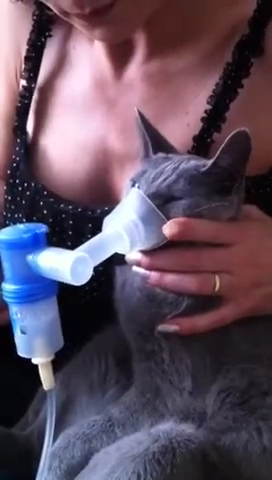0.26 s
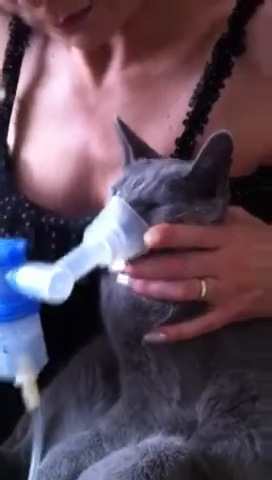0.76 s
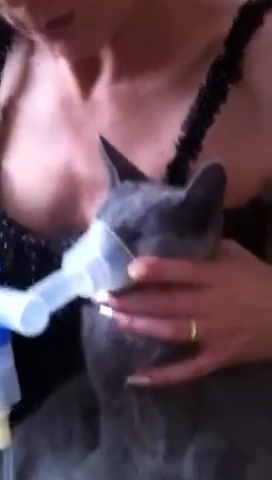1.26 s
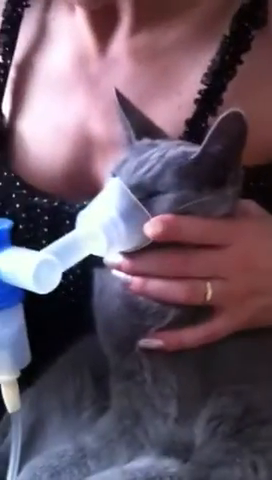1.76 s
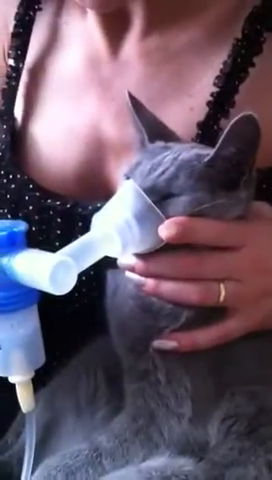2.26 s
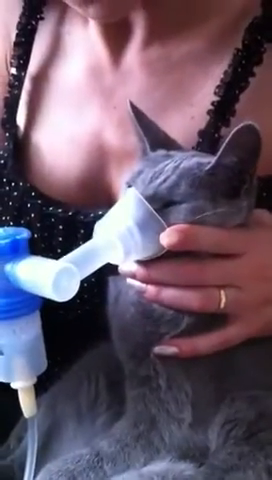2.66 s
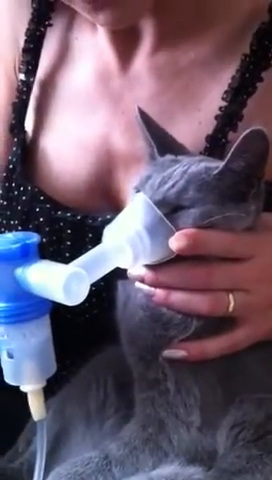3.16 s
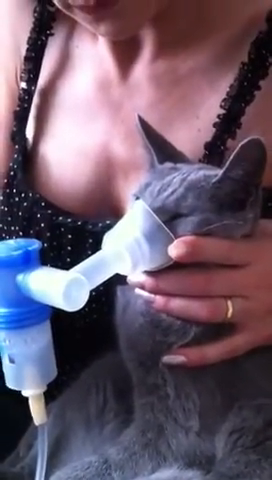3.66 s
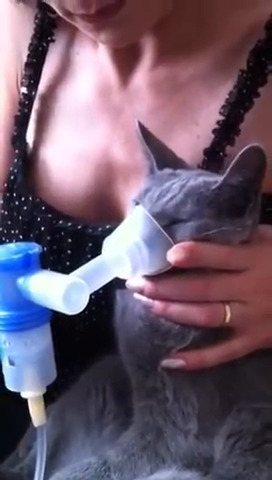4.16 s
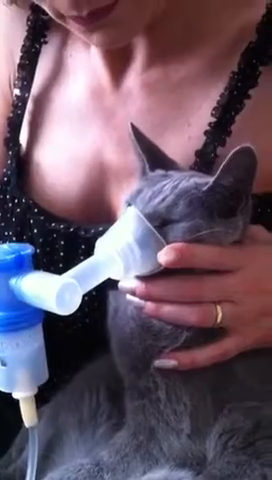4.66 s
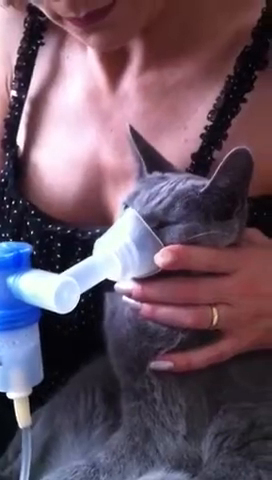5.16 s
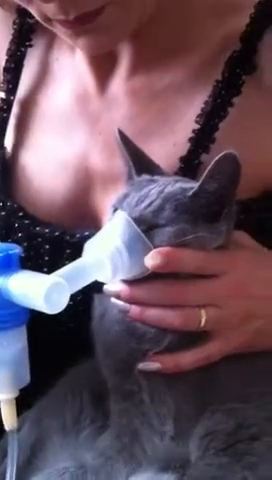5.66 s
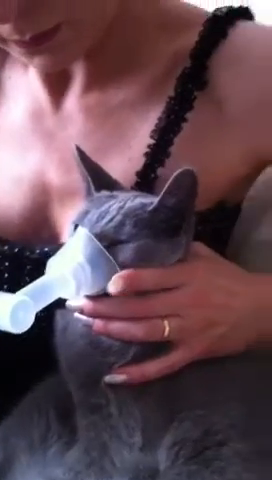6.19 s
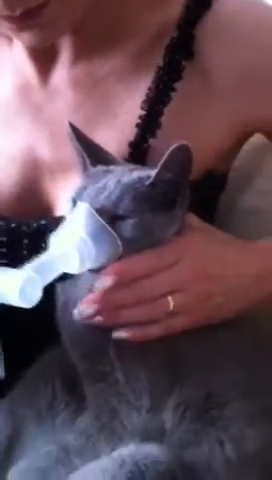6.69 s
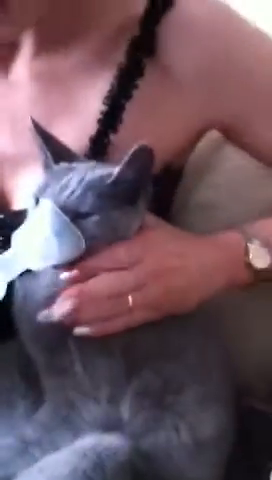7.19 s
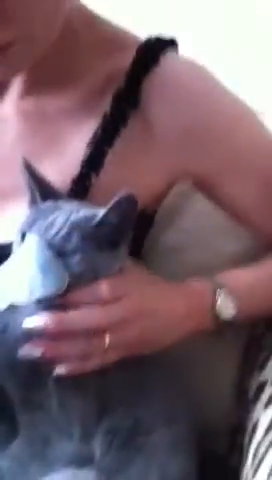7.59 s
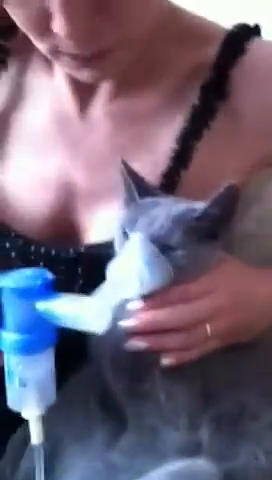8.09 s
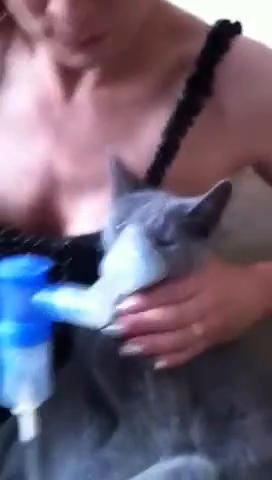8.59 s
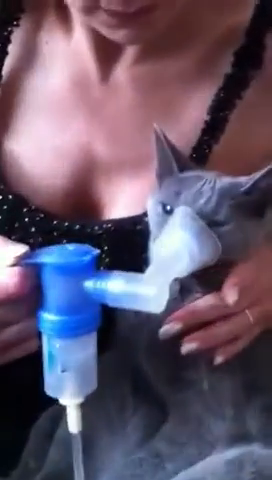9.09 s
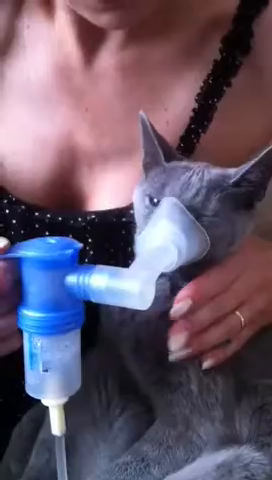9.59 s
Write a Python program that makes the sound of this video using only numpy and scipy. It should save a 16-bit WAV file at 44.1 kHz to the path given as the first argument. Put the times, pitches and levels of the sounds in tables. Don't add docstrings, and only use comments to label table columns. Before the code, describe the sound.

Steady nasal motor buzz and bright, slightly whistling mist hiss, close up in a room, with a sharp double plastic click near the end.

```python
import sys
import numpy as np
from scipy import signal
from scipy.fft import rfft, irfft, next_fast_len
from scipy.io import wavfile
from scipy.ndimage import uniform_filter1d, map_coordinates

SR = 44100
rng = np.random.default_rng(int(sys.argv[2]) if len(sys.argv) > 2 else 0)


def store_wav(level_fs):
    pcm = np.round(np.clip(np.atleast_2d(level_fs), -1, 1) * 32767)
    wavfile.write(sys.argv[1], SR, pcm.T.astype(np.int16))


def natural_amplitude(level_db):
    exponent = np.asarray(level_db, float) / 20
    return 10 ** exponent


N = 433944
SHAFT_HZ, FIELD_HZ = 44.33, 100

# (order, first place [dB rms], second place [dB rms])
ORDER_LEVELS = [(2, -80.0, -80.0), (3, -72.0, -72.0), (4, -52.0, -51.0), (5, -67.0, -68.0),
                (6, -53.0, -54.0), (7, -66.0, -66.0), (8, -61.0, -79.0), (9, -66.0, -59.0),
                (10, -67.0, -63.0), (11, -66.0, -58.0), (12, -68.0, -66.0), (13, -59.0, -54.0),
                (14, -53.0, -52.0), (15, -56.0, -48.0), (16, -48.0, -48.0), (17, -55.0, -58.0),
                (18, -71.0, -66.0), (19, -61.0, -58.0), (20, -58.0, -61.0), (21, -63.0, -67.0),
                (22, -69.0, -67.0), (23, -71.0, -80.0)]
UPPER_ORDERS = np.arange(24, 37)
UPPER_DB, UPPER_SCATTER_DB = -75.5, 3


def order_levels():
    scatter_db = UPPER_SCATTER_DB * rng.standard_normal((len(UPPER_ORDERS), 2))
    return np.vstack([ORDER_LEVELS, np.column_stack([UPPER_ORDERS, UPPER_DB + scatter_db])])


# (time after the mark [ms], strength [0-1])
VALVE_CONTACTS = [
    (1.47, .46),
    (6.9, .53),
    (13.83, 1),
]
# (time after the mark [ms], strength [ratio])
PISTON_REVERSALS = [
    (4.9, 1),
    (15.8, 1.5),
]


def knock_phases(order):
    f = order * SHAFT_HZ

    def ring(center, width):
        return 1j * f * width / (center ** 2 - f ** 2 + 1j * f * width)

    def train(knocks):
        return sum(strength * np.exp(-2j * np.pi * f * ms / 1000) for ms, strength in knocks)

    head = train(VALVE_CONTACTS) * ring(697, 180) ** 2
    case = .33 * train(PISTON_REVERSALS) * ring(300, 80)
    return np.angle(head + case)


def compressor(angle):
    order, first_db, second_db = order_levels().T
    share, nearness_db = microphone_place()
    drift = np.array([wobble(1.0), wobble(1.8), wobble(2.13)])
    drone = np.zeros(N)
    for k, first, second, phase in zip(np.round(order), first_db, second_db, knock_phases(order)):
        level_db = first + (second - first) * share
        level_db = level_db + 0.046 * k * drift[int(k) % 3]
        level_db = level_db + nearness_db * (k > 8)
        drone += natural_amplitude(level_db) * np.cos(k * angle + phase)
    return np.sqrt(2) * drone


# (shaft order, multiple of the field, level [dB rms])
FIELD_LINES = [(1, 1, -66), (7, 1, -76), (11, 2, -78), (12, 2, -79), (13, 2, -76), (18, 1, -69),
               (20, -1, -68), (22, -1, -70), (41, 0, -77), (45, 0, -83), (47, 0, -84)]


def mains_ripple(angle):
    field = 2 * np.pi * FIELD_HZ * np.arange(N) / SR
    starts = rng.uniform(0, 2 * np.pi, len(FIELD_LINES))
    lines = np.zeros(N)
    for (k, multiple, db), start in zip(FIELD_LINES, starts):
        lines += natural_amplitude(db) * np.cos(round(k) * angle + round(multiple) * field + start)
    return np.sqrt(2) * lines


# (time [s], lead [ms])
SHAFT_LEAD = [(0.05, .15), (.9, -.02), (1.8, .38), (3.05, .46), (4.2, .35), (5, -.02), (6.1, .45),
              (7.05, .27), (8.5, .73), (9.75, .56)]
SKIP_S, SKIP_MS = 3.578, .665
SWAY = .018


def shaft_angle():
    t = np.arange(N) / SR
    ahead_ms = curves(SHAFT_LEAD)[0] + SKIP_MS * (t > SKIP_S)
    steady = 2 * np.pi * SHAFT_HZ * (t + ahead_ms / 1000)
    return steady + SWAY * np.cos(2 * np.pi * FIELD_HZ * t - 2 * steady + 2.4)


# (time [s], nozzle's aim at the microphone [dB], leak of the mask [dB])
JET_HOLD = [(0.0, -49.5, -58.5), (0.49, -49.5, -60), (1.56, -47, -59), (1.67, -46.5, -57),
            (3.53, -46.5, -58), (5.73, -47.5, -60), (6.38, -47, -57), (6.63, -45.5, -57.5), (6.9, -46, -62),
            (7.21, -46, -55.5), (7.43, -47.5, -60.5), (8.49, -48.5, -58), (9.1, -46.5, -59),
            (9.84, -46.5, -58.5)]
WHISTLE_DB, CUP_DB, TUBE_DB, SPRAY_DB = -47.5, -55, -53.5, -56
CUP_FOLLOWS, TUBE_FOLLOWS, SPRAY_FOLLOWS = .1, .02, 0.28
SLOSH_DB, SLOSH_RATE = -0.34, 2.5


def jet_levels():
    aim_db, leak_db = (c - c.mean() for c in curves(JET_HOLD))
    whistle_db = WHISTLE_DB + aim_db
    cup_db = CUP_DB + CUP_FOLLOWS * aim_db + SLOSH_DB * wobble(SLOSH_RATE)
    tube_db = TUBE_DB + leak_db + TUBE_FOLLOWS * aim_db
    spray_db = SPRAY_DB + SPRAY_FOLLOWS * aim_db
    return whistle_db, cup_db, tube_db, spray_db


# (frequency [Hz], width [Hz], level [dB])
WHISTLE_FIRST = [(5187, 240, 0), (4915, 740, -10.5), (5460, 350, -10.5), (6130, 360, -19.5)]
WHISTLE_SECOND = [(5210, 390, 1), (4750, 680, -4.5), (5450, 320, -9), (6020, 400, -16.5)]
# (frequency [Hz], width [Hz], level [dB])
CUP_AIR = [(3985, 260, -3.5), (4240, 550, -10)]
TUBE_AIR = [(1579, 120, -2), (1416, 480, -9.5)]
# (frequency [Hz], level [dB per Hz])
SPRAY_FIRST = [(5500, -33), (6700, -9), (7370, -1.5), (8640, -5.5), (9370, -1.5), (10100, -2.5), (12100, 2),
               (14200, -10.5), (15400, -10.5), (15750, -8.5)]
SPRAY_SECOND = [(5500, -40), (6500, -14), (7200, -0.5), (8300, -5.5), (9000, -1.5), (11400, 0), (12400, 4),
                (14400, -14), (15400, -3), (15750, -24)]


def nebulizer(angle):
    whistle_db, cup_db, tube_db, spray_db = jet_levels()
    stroke = np.cos(angle + 4.1) + 0.87 * np.cos(2 * angle + 4.5)
    flutter = wobble(40)
    share, _ = microphone_place()
    first, second = np.sqrt(1 - share), np.sqrt(share)

    nozzle = first * hiss(resonant(WHISTLE_FIRST), patchy_db=1.0)
    nozzle = nozzle + second * hiss(resonant(WHISTLE_SECOND), patchy_db=1.0)
    whistle = natural_amplitude(whistle_db + 0.38 * stroke + 0.31 * wobble(14) + 0.1 * flutter) * nozzle

    cup_gain = natural_amplitude(cup_db + 0.2 * stroke + 0.2 * wobble(23))
    cup = cup_gain * hiss(resonant(CUP_AIR), patchy_db=-1.0)

    tube_gain = natural_amplitude(tube_db - 2.5 + .5 * stroke + 0.65 * wobble(30) + 1.4 * flutter)
    tube = tube_gain * hiss(resonant(TUBE_AIR), patchy_db=2.0)

    mist = first * hiss(sloped(SPRAY_FIRST), patchy_db=1.0)
    mist = mist + second * hiss(sloped(SPRAY_SECOND), patchy_db=1.0)
    spray = natural_amplitude(spray_db + 0.27 * stroke + 0.22 * flutter) * mist
    return whistle + cup + tube + spray


# (time [s], peak level [dB], crack level [dB])
MASK_SNAPS = [
    (7.6205, -20.5, -14),
    (7.6566, -13.2, -14),
]
# (frequency [Hz], width [Hz], level [dB])
MASK_SHELL = [(706, 103, 3), (1480, 840, 1.5), (1780, 580, 4), (2550, 280, 1), (3270, 180, -0.5),
              (4870, 760, -4.5)]
MASK_RIM = [(6130, 560, -20), (9670, 1100, 7), (11500, 1800, 0), (14800, 2500, -18)]


def mask():
    flicks, blows = np.zeros(N), np.zeros(N)
    for s, db, crack_db in MASK_SNAPS:
        flicks[round((s + .0008) * SR)] = natural_amplitude(db + crack_db + 19)
        blows[round((s + .0007) * SR)] = -natural_amplitude(db + 22.0)
        blows[round((s + .0019) * SR)] = natural_amplitude(db + 11)
    return filtered(flicks, struck(MASK_RIM)) + filtered(blows, struck(MASK_SHELL))


# (frequency [Hz], level [dB per Hz])
RATTLE_COLOUR = [(30, -47), (60, -42), (120, -15), (180, -5.5), (500, -7.5), (750, -0.5), (1100, -6),
                 (2000, -10.5), (2800, -13), (3500, -14.5), (4500, -54)]


def housing_rattle(angle):
    return natural_amplitude(-55 + 0.57 * np.cos(2 * angle)) * hiss(sloped(RATTLE_COLOUR), patchy_db=-0.8)


# (time [s], share of the second place [0-1], nearness [dB])
MICROPHONE_PLACE = [
    (0, 0.06, 0),
    (1.5, 0, 0.5),
    (6, 0, 0),
    (6.8, 0.07, 1.5),
    (7.4, 0.1, 1.5),
    (8.1, 0.52, 1),
    (8.8, 1, -0.5),
    (9.84, 0.96, .5),
]


def microphone_place():
    share, nearness_db = curves(MICROPHONE_PLACE)
    return np.clip(share, 0, 1), nearness_db


# (frequency [Hz], width [Hz], gain
# [dB])
BODY_REFLECTIONS = [(2768, 120, -4), (3480, 87, -3), (6880, 180, 1), (7710, 210, -4.5), (8700, 110, -2.5),
                    (10130, 250, -6.5), (11630, 160, -5), (13300, 180, 2), (14270, 330, 4)]


def reflections(hz):
    return natural_amplitude(sum(db / (1 + (2 * (hz - c) / w) ** 2) for c, w, db in BODY_REFLECTIONS))


def unit(x):
    return x / np.sqrt(np.mean(x ** 2) + 1e-20)


def curves(rows):
    s, *columns = np.transpose(rows)
    return [np.interp(np.arange(N) / SR, s, c) for c in columns]


def wobble(rate):
    knots = rng.standard_normal(int(N * rate / SR) + 4)
    return map_coordinates(knots, [np.arange(N) * rate / SR])


def sloped(points):
    f, db = np.transpose(points)
    return lambda hz: natural_amplitude(np.interp(np.log(hz + 1), np.log(f + 1), db))


def resonant(modes):
    def gain(hz):
        return np.sqrt(sum(natural_amplitude(db) ** 2 / (1 + (2 * (hz - c) / w) ** 2) ** 1.75 for c, w, db in modes))
    return gain


def struck(modes):
    def response(f):
        return sum((-1) ** k * natural_amplitude(db) * 1j * f * w / (c * c - f * f + 1j * f * w)
                   for k, (c, w, db) in enumerate(modes))
    return response


def hiss(gain, patchy_db):
    hz, _, z = signal.stft(rng.standard_normal(N + 1024), SR, nperseg=1024)
    patches = uniform_filter1d(rng.standard_normal(z.shape), size=8, axis=0)
    patches = unit(uniform_filter1d(patches, size=6, axis=1))
    z = z * gain(hz)[:, None] * natural_amplitude(patchy_db * patches)
    return unit(signal.istft(z, SR, nperseg=1024)[1][:N])


def filtered(x, gain):
    m = next_fast_len(N + 8192)
    return irfft(rfft(x, m) * gain(np.fft.rfftfreq(m, 1 / SR)), m)[..., :N]


def scene():
    angle = shaft_angle()
    machine = compressor(angle) + mains_ripple(angle) + housing_rattle(angle)
    return (filtered(machine + nebulizer(angle), reflections) + mask())[None]


# (frequency [Hz], bar against the usual level nearby [dB])
SPARED_BAR = [(1800, -30), (2100, -3), (3600, -2), (3800, -30), (6000, -30), (6400, -.5), (13300, 0),
              (13700, 2), (15700, 2)]


def starved(x):
    hz, _, z = signal.stft(x, SR, nperseg=2048)
    power = np.abs(z) ** 2 + 1e-20
    cell = uniform_filter1d(power, size=3, axis=-2)
    cell = np.abs(uniform_filter1d(cell, size=2, axis=-1))
    log_around = uniform_filter1d(np.log(power), size=70, axis=-2, mode="nearest")
    usual = np.exp(np.median(log_around, axis=-1, keepdims=True))
    kept = cell > usual * sloped(SPARED_BAR)(hz)[:, None] ** 2
    return signal.istft(z * kept, SR, nperseg=2048)[1][..., :N]


def spent(x):
    hz, t, z = signal.stft(x, SR, nperseg=256)
    cell = uniform_filter1d(np.abs(z) ** 2, size=5, axis=-2)
    cell = uniform_filter1d(cell, size=2, axis=-1)
    bar = np.median(cell[..., hz > 6500, :]) * natural_amplitude(8) ** 2
    after_snap = sum((t > s + .006) & (t < s + .03) for s, *_ in MASK_SNAPS) > 0
    return signal.istft(z * ~(after_snap & (cell < bar)), SR, nperseg=256)[1][..., :N]


def top_cut(x):
    return signal.sosfilt(signal.butter(12, 16960, fs=SR, output="sos"), x)


def record(dry):
    t = np.arange(N) / SR
    open_now = sum(np.exp(-((t - s - .001) / .0015) ** 2) for s, *_ in MASK_SNAPS)
    low = filtered(dry, lambda hz: hz < 15750)
    top = filtered(dry - low, lambda hz: hz < 16800)
    mix = spent(starved(low + open_now * top))
    return top_cut(mix)


dry = scene()
out = record(dry)
store_wav(out)
```